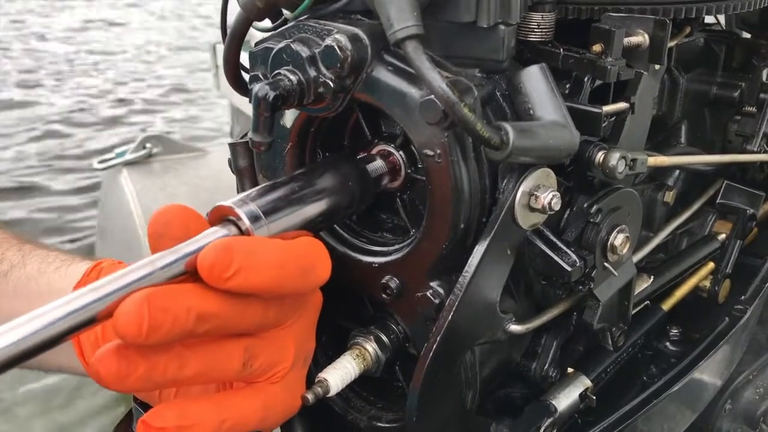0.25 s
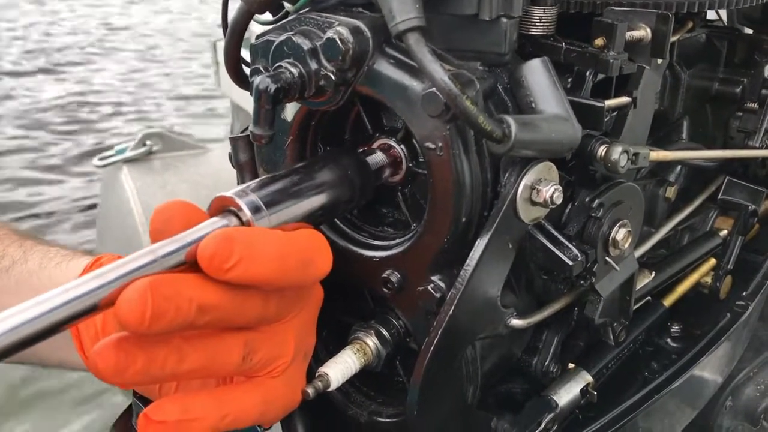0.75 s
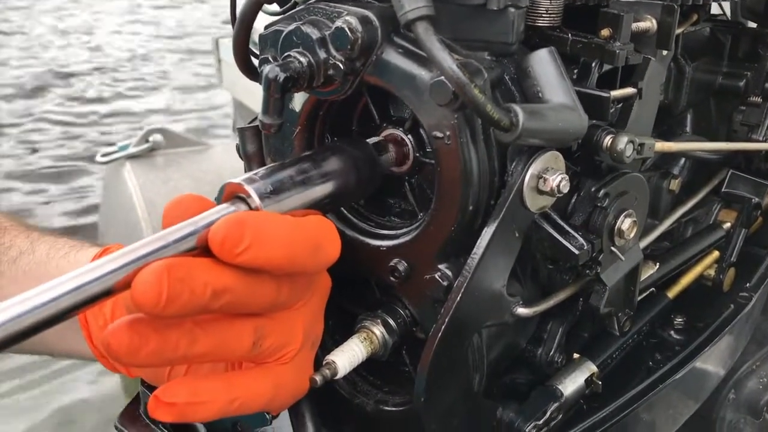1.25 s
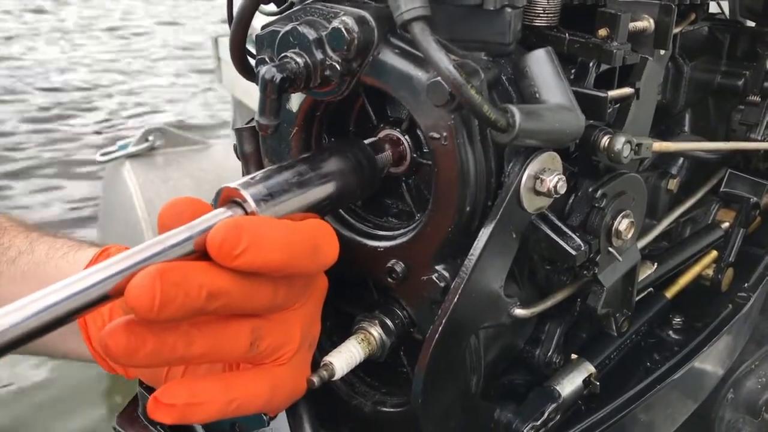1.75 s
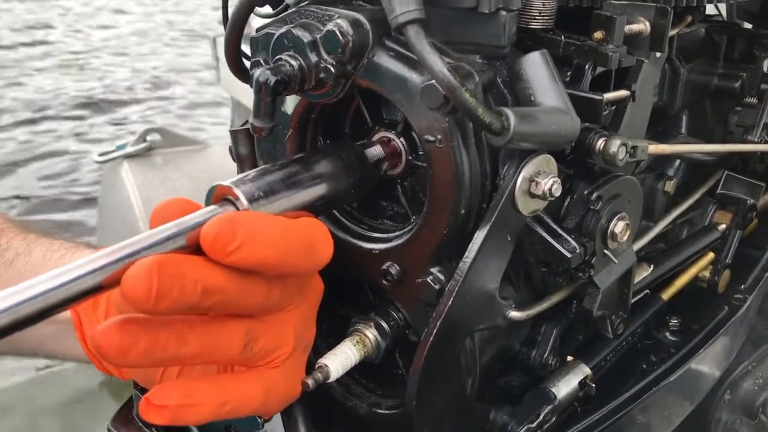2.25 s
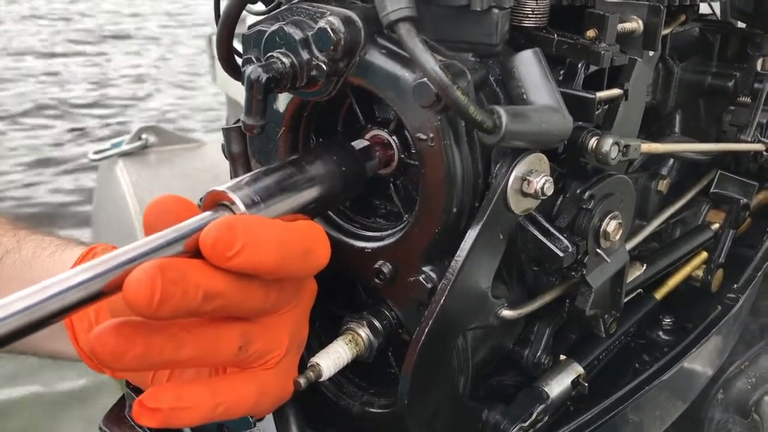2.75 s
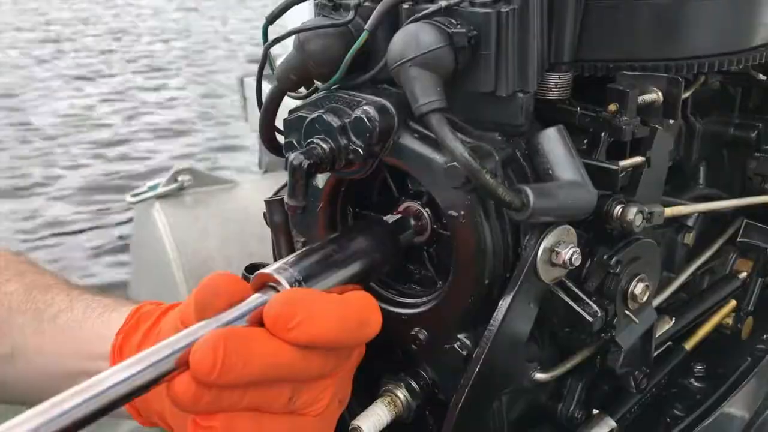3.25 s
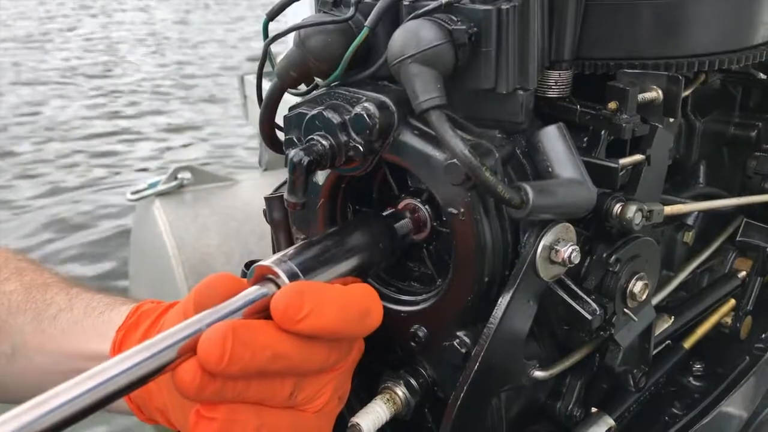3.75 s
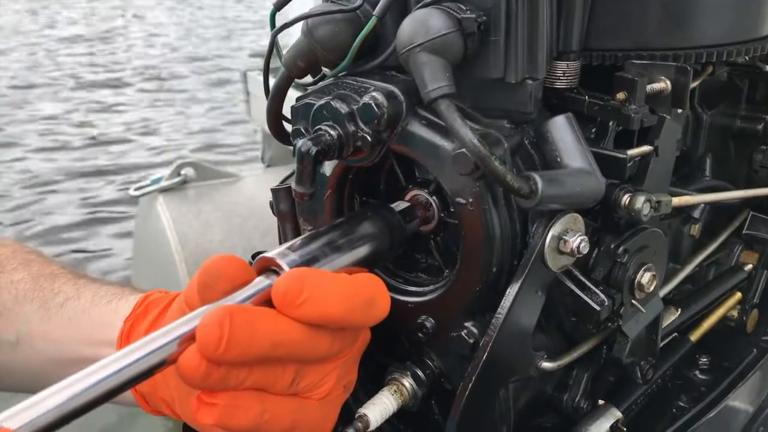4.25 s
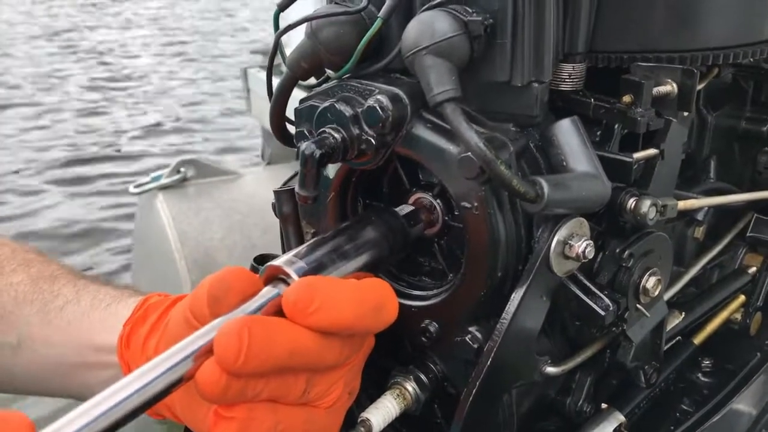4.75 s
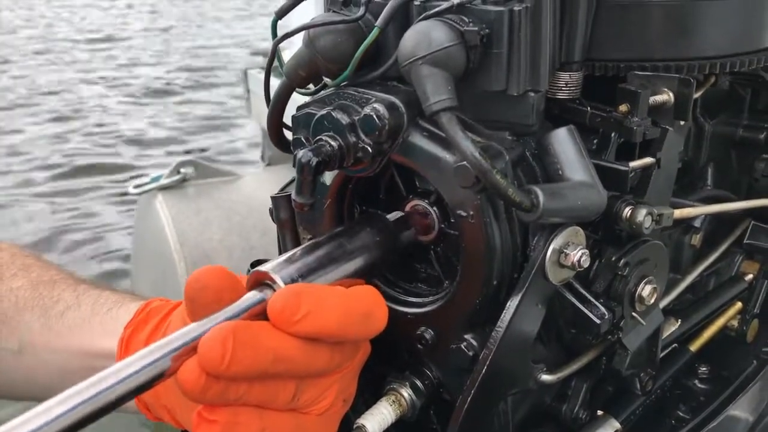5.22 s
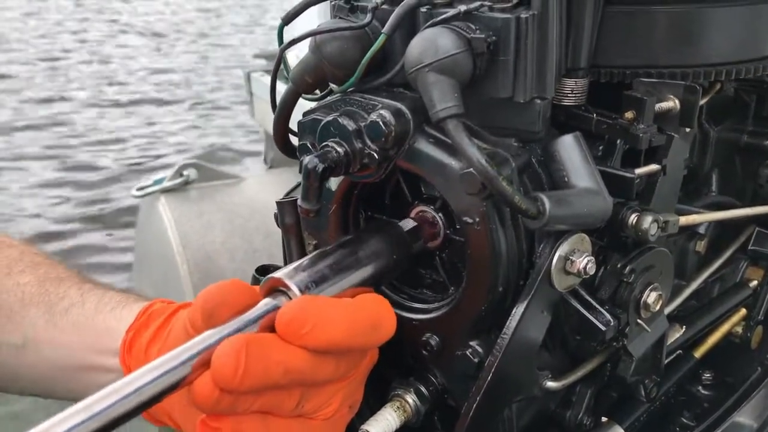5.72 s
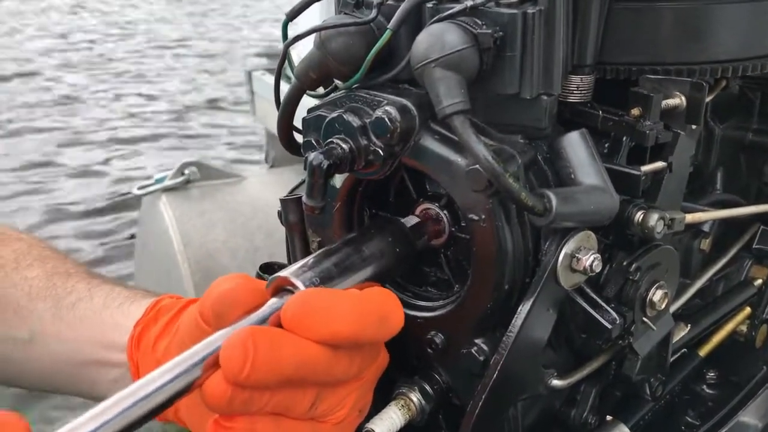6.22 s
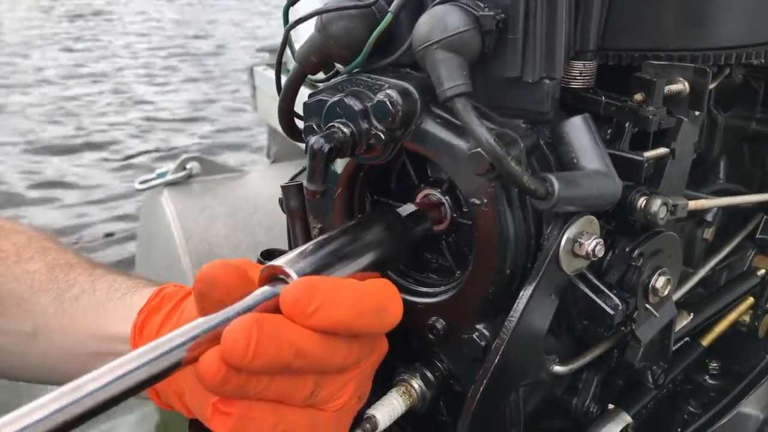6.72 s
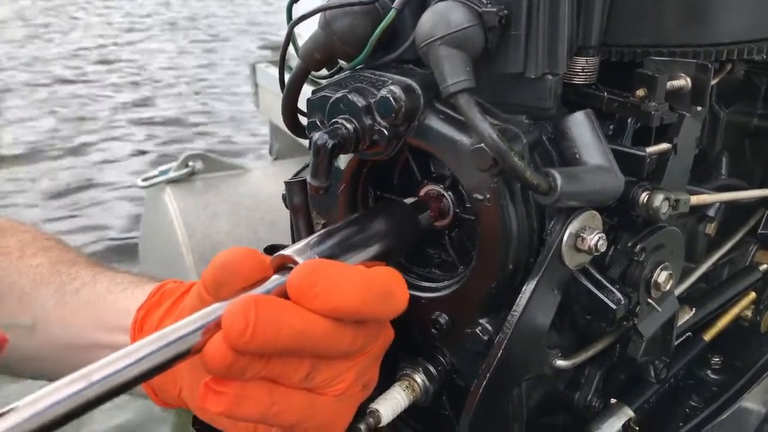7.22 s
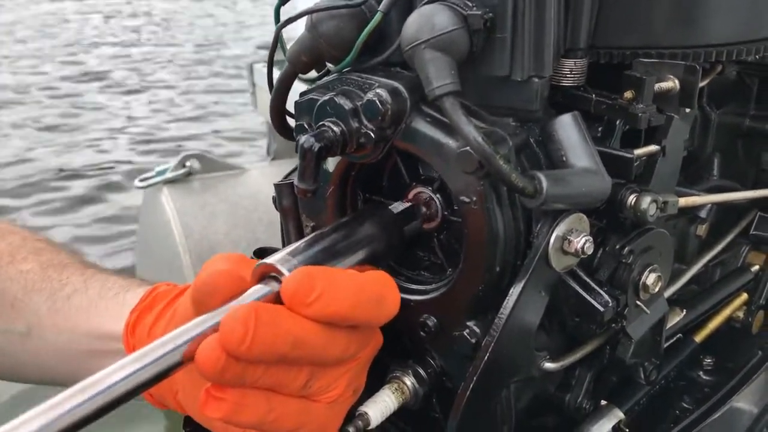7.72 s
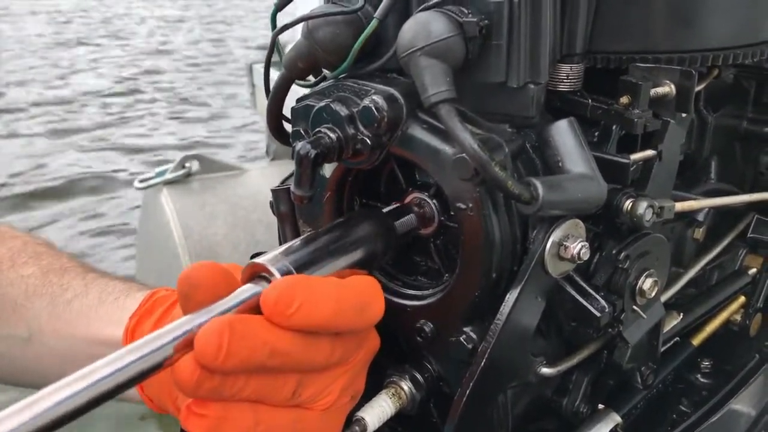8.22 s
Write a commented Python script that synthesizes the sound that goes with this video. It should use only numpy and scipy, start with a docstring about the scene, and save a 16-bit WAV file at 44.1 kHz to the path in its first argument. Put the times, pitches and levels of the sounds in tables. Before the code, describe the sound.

A socket ratchet clicks in six short bursts on an outboard engine, over low traffic rumble, lapping lake water and faint birds.

```python
"""By a lake, over traffic rumble and lapping, water plops and a socket ratchet on an outboard engine
is swung back in the first of six bursts of pawl clicks; between swings tool and gloves tick and rustle.
Far birds chirp throughout; from 2.6 s a near one whistles a figure three times. From about 3 s to 7 s
a far motor hums, then comes the last burst. After each loud click the close microphone stays in its
noisier high-level range for a moment."""
import sys
import numpy as np
from scipy import signal
from scipy.io import wavfile
from scipy.ndimage import uniform_filter1d

SR = 44100
rng = np.random.default_rng(int(sys.argv[2]) if len(sys.argv) > 2 else 0)


def inscribe(sig):
    """Save sig as 16-bit PCM at rate SR to the path in sys.argv[1].

    A 1-D sig is mono; a 2-D sig holds one channel per row.
    Samples are clipped to [-1, 1] before scaling.
    """
    pcm = np.round(np.clip(np.atleast_2d(sig).T, -1, 1) * 32767)
    wavfile.write(sys.argv[1], SR, pcm.astype(np.int16))


N = 373968


def undb(db):
    return 10 ** (np.asarray(db) / 20)


def band(x, lo_hz, hi_hz, order=2):
    sos = signal.butter(order, [lo_hz, min(hi_hz, .45 * SR)], "band", fs=SR, output="sos")
    return signal.sosfilt(sos, x)


def lowpass(x, hz):
    return signal.sosfilt(signal.ellip(10, .2, 70, hz, fs=SR, output="sos"), x)


def fade(t, t60_s):
    return np.exp(-np.log(1000) * t / t60_s)


def sine(pitch_hz):
    return np.sin(2 * np.pi * np.cumsum(pitch_hz) / SR)


def loudness(x):
    """Rms over 2 ms."""
    return np.sqrt(np.abs(uniform_filter1d(x ** 2, SR // 500)))


def add(out, start_s, x, db):
    """Mix x in with its loudest 2 ms at db."""
    i = int(start_s * SR)
    out[i:i + len(x)] += (x * undb(db) / loudness(x).max())[:N - i]


def drift(rate_hz):
    """Random steps, smoothed twice; spread near 1."""
    hold = int(SR / rate_hz)
    steps = np.repeat(rng.standard_normal(N // hold + 1), hold)
    return 1.665 * uniform_filter1d(uniform_filter1d(steps, hold), hold)[:N]


def curve(table, column):
    rows = np.array(table)
    return np.interp(np.arange(N) / SR, rows[:, 0], rows[:, column])


# Modes of head and handle. Each row: frequency in Hz, relative level in dB, T60 in seconds.
HEAD_MODES = [(2450, -3, .02), (3025, 7.5, 0.03), (3370, -2.5, 0.04), (4630, 1.5, 0.039),
              (5840, 20.5, 0.0067), (6770, 3, 0.017), (8670, 13, 0.012), (9800, -8, 0.016),
              (11300, -20, 0.007), (12100, 8, 0.016), (13100, 13, 0.017), (14330, 4, 0.017),
              (15800, 6, 0.017)]
# Each row: low and high edge of a click band in Hz.
CLICK_BANDS_HZ = [2300, 4000], [4000, 7500], [7500, 10500], [10500, 15400]
# Each row: start in seconds, level in dB, treble tilt in dB per octave.
PAWL_DROPS = [(0.2865, -13.8, 1.4), (0.327, -15.6, 1.2), (0.3678, -17.6, 2.4), (0.4052, -14.0, 2.0),
              (0.446, -13.3, 2.5), (0.4938, -14.7, 1.1), (0.5732, -15.5, 0.5), (1.637, -10.9, 3.8),
              (1.6865, -12.8, 2.2), (1.7251, -14.0, 0.2), (1.7727, -15.7, 4.0), (1.8244, -13.3, 2.4),
              (1.8759, -13.6, 5.1), (1.9203, -14.7, 0.7), (1.956, -16.3, 0.1), (3.2586, -18.4, -1.0),
              (3.2882, -16.7, 1.3), (3.3176, -16.1, 0.8), (3.3454, -16.1, 0.2), (3.3733, -18.0, -1.2),
              (3.3995, -17.7, -2.5), (3.4291, -17.7, 0.5), (3.472, -19.3, -0.0), (4.2825, -14.3, 1.2),
              (4.3099, -15.6, -1.4), (4.3331, -15.5, 0.1), (4.3566, -18.6, -1.7), (4.382, -16.6, -0.8),
              (4.4084, -20.4, -2.7), (4.4404, -18.8, -2.9), (4.47, -17.8, 1.7), (4.5013, -15.3, 1.3),
              (4.5413, -12.3, 2.4), (4.5909, -9.8, 2.8), (5.9061, -15.5, -1.1), (5.9739, -19.1, -3.1),
              (6.0111, -14.4, -2.8), (6.0434, -14.3, -4.2), (6.0771, -15.8, -5.2), (6.1071, -16.9, -0.2),
              (6.1373, -16.2, -1.8), (6.1694, -15.5, 1.1), (6.2231, -12.1, 3.3), (7.1162, -17.4, -1.4),
              (7.1611, -17.0, 0.1), (7.2033, -16.5, -1.1), (7.2383, -16.7, -3.1), (7.2656, -16.2, -1.4),
              (7.2937, -19.6, -4.8), (7.3237, -19.7, -4.6), (7.3584, -19.3, -2.6), (7.4012, -16.1, 1.9),
              (7.4582, -14.8, 3.2)]


def ratchet():
    """The pawl drops over a tooth: snap and rebound ring the head; engine parts scatter a tail."""
    out, t = np.zeros(N), np.arange(SR // 12) / SR
    hz, mode_db, t60_s = np.array(HEAD_MODES).T[:, :, None]
    octaves = np.log2(CLICK_BANDS_HZ).mean(axis=1)
    base_colour_db, knock_db = [-14, -6.5, -4, -3.5], -25.5
    for start_s, db, tilt_db in PAWL_DROPS:
        strength, detune, offset = rng.standard_normal((3, len(HEAD_MODES), 1))
        phase = 2 * np.pi * (hz * (1 + .006 * detune) * t + offset)
        modes = undb(mode_db + 2.5 * strength) * fade(t, t60_s) * np.sin(phase)
        ring = undb(-.9 * tilt_db)  # bright drops seat firmly and ring less
        head = .016 * ring * modes.sum(axis=0)
        head[0] += 1  # bare crack of steel on steel
        impact, tail = rng.standard_normal((2, len(t)))
        blow = impact * fade(t, .002)
        rebound_lag = int(SR * .0012 * rng.uniform(.8, 1.2))
        blow[rebound_lag:] += .68 * blow[:-rebound_lag]
        blow += tail * ring * (.14 * fade(t, .032) + .031 * fade(t, .097))
        snap = signal.fftconvolve(blow, head)[:len(t)]
        colour_db = base_colour_db + tilt_db * (octaves - octaves.mean())
        colour_db += .58 * rng.standard_normal(len(octaves))
        click = np.zeros(len(t))
        for (lo_hz, hi_hz), band_db in zip(CLICK_BANDS_HZ, colour_db):
            add(click, 0, band(snap, lo_hz, hi_hz, order=3), band_db)
        add(click, 0, band(snap, 1040, 2080), knock_db)  # through socket and engine block
        add(out, start_s, click, db)
    return out


# Each row: start in seconds, level in dB, band centre in Hz.
TOOL_TICKS = [(0.11, -40.5, 3140), (0.158, -52, 5900), (0.1935, -44.5, 2940), (0.2259, -48, 2440),
              (2.05, -47, 1440), (2.5, -46.5, 2730), (3.0065, -49, 4520), (3.028, -45.5, 4140),
              (3.638, -50.5, 2350), (3.8553, -49.5, 4200), (4.211, -51.5, 2400), (4.7614, -33, 6500),
              (4.793, -47.5, 3500), (4.828, -46.5, 1500), (5.163, -58, 2400), (5.5328, -50, 2120),
              (5.6685, -51.5, 3200), (5.686, -51.5, 2850), (5.7478, -43.5, 1860), (6.324, -48.5, 4540),
              (6.34, -45, 2800), (7.0, -43.5, 2230), (7.649, -41, 2140), (7.6804, -43, 1890),
              (7.7104, -44, 2420), (8.2123, -50.5, 1880), (8.238, -51, 1600), (8.35, -52.5, 2400),
              (8.372, -50.5, 8800)]


def tool_ticks(width_octaves=1.73, t60_s=.054):
    """Play in socket, extension and gloves: each knock is a short noise burst."""
    out, t = np.zeros(N), np.arange(SR // 10) / SR
    edge_ratio = 2 ** (width_octaves / 2)
    for start_s, db, hz in TOOL_TICKS:
        burst = rng.standard_normal(len(t)) * fade(t, t60_s) * (1 - fade(t, .0023))
        add(out, start_s, band(burst, hz / edge_ratio, hz * edge_ratio), db)
    return out


def rustle():
    """Gloves and ripples: faint crackles of uneven size, in patches."""
    rate_hz = 60 * undb(5 * drift(4))
    onsets = rng.random(N) < rate_hz / SR
    pops = onsets * undb(2.2 * rng.exponential(size=N))
    t = np.arange(SR // 30) / SR
    envelope = signal.oaconvolve(pops, fade(t, .048) * (1 - fade(t, .01)))[:N]
    return undb(-75.5) * band(envelope * rng.standard_normal(N), 740, 6300)


# Each row: start in seconds, level in dB, start pitch in Hz, ratio of end to start pitch.
HULL_PLOPS = [(.085, -49, 615, 1.66), (0.091, -44.5, 2150, 1.26), (.135, -43, 2760, 1.06),
              (1.945, -34.5, 1074, 0.93), (2.755, -33, 558, 1.32), (3.025, -48.5, 885, 1.14),
              (3.70, -47, 489, 1.6), (5.575, -39, 500, 0.71), (5.665, -47.5, 618, 1.4),
              (5.71, -47.5, 664, 1), (6.575, -43, 402, 0.92)]


def plops(glide_s=.04):
    """A bubble trapped at the hull rings, mostly gliding up as it surfaces; splash roughens it."""
    out, t = np.zeros(N), np.arange(SR // 6) / SR
    for start_s, db, hz, ratio in HULL_PLOPS:
        bubble = sine(hz * ratio ** np.minimum(t / glide_s, 1))
        splash = 1.94 * band(rng.standard_normal(len(t)), hz / 1.52, hz * 1.33)
        envelope = fade(t, .15 * np.sqrt(600 / hz)) * (1 - fade(t, .0062))
        add(out, start_s, (bubble + splash) * envelope, db)
    return out


# Each row: start in seconds, length in seconds, start and end pitch in Hz, level in dB.
BIRD_NOTES = [(2.329, 0.034, 4800, 3900, -55.5), (2.466, 0.029, 3290, 4160, -56),
              (2.934, 0.017, 3310, 3980, -49), (2.995, .012, 4820, 4280, -47),
              (3.029, .03, 4600, 2860, -49), (3.085, 0.044, 3600, 3210, -52.5),
              (3.13, 0.028, 3900, 2750, -49.5), (3.823, 0.079, 3500, 3540, -64),
              (4.125, 0.032, 5770, 5600, -57.5), (5.045, .095, 3450, 3290, -66),
              (6.572, 0.074, 6200, 6300, -57), (6.585, 0.071, 5520, 5480, -58),
              (7.538, 0.032, 3700, 5200, -64), (7.616, .03, 4500, 5500, -69),
              (8.353, .024, 5860, 5600, -68), (8.42, 0.026, 3570, 4600, -65)]
# A near bird's figure. Each row: as above, timed from the start of the figure.
BIRD_FIGURE = [(0, 0.029, 6740, 6240, -55.5), (0.047, .024, 5120, 3420, -45)]
# Start of each repeat in seconds.
FIGURE_STARTS_S = [2.611, 2.724, 2.838]


def birds(near_rasp=.132, echo_t60_s=.5, echo_db=2):
    """Gliding whistles, rasping with pitch flutter, blurred by echoes from the shore."""
    out = np.zeros(N)
    song = [(start_s + s, *note) for start_s in FIGURE_STARTS_S for s, *note in BIRD_FIGURE]
    near_notes = [(*note, near_rasp) for note in song + BIRD_NOTES]
    for start_s, length_s, from_hz, to_hz, db, rasp in near_notes + far_bird_notes():
        n = int(length_s * SR)
        flutter = uniform_filter1d(rng.standard_normal(SR // 4), size=30)[:n]
        pitch_hz = np.linspace(from_hz, to_hz, n) * (1 + rasp * flutter)
        add(out, start_s, sine(pitch_hz) * np.sqrt(np.hanning(n)), db)
    t = np.arange(SR // 2) / SR
    shore = rng.standard_normal(len(t)) * fade(t, echo_t60_s)
    shore /= np.linalg.norm(shore)
    return out + undb(echo_db) * signal.oaconvolve(out, shore)[:N]


def far_bird_notes(count=70):
    """Faint random chirps: rows like BIRD_NOTES, plus rasp depth."""
    when, length, pitch, glide, level, rasp = rng.random((count, 6)).T
    start_s, length_s = when * (N / SR - .2), .012 + .03 * length
    from_hz = 2600 * 2 ** (1.2 * pitch)
    to_hz = from_hz * (1 + .35 * (glide - .6))
    return list(zip(start_s, length_s, from_hz, to_hz, -69 + 7 * level, .3 + .6 * rasp))


# Each row: time in seconds, relative levels of traffic rumble and of lapping in dB.
LAKESIDE_SWELL = [(0, -47.5, -51.5), (.9, -47, -52.5), (2, -50.5, -50), (2.7, -49, -51.5),
                  (3.6, -47.5, -50), (4.8, -44, -50), (5.7, -47, -48), (6.5, -48, -51.5), (7.5, -45, -53),
                  (8.48, -49, -47)]
# Each row: frequency in Hz, relative noise density in dB.
LAKESIDE_SPECTRUM = [(25, -38.5), (40, -10.5), (70, 1.5), (102, -5), (170, -10), (335, -19), (700, -25),
                     (1300, -29.5), (1800, -36), (3000, -34.5), (5000, -40), (7000, -43.5), (8000, -44.5),
                     (16000, -47.5)]
HISS_TOP_HZ = 15800


def lakeside(rms_db=-43):
    """Flickering half-octave noise bands: traffic sways the bass, lapping water the low middle."""
    out = np.zeros(N)
    spectrum_hz, density_db = np.array(LAKESIDE_SPECTRUM).T
    traffic_db, lapping_db = curve(LAKESIDE_SWELL, column=1), curve(LAKESIDE_SWELL, column=2)
    traffic_db -= traffic_db.mean()
    lapping_db -= lapping_db.mean()
    noises = rng.standard_normal((2, N))  # neighbouring bands get unrelated noise
    for k, hz in enumerate(25 * 2 ** np.arange(0, 9.5, .5)):
        bass = 1 / (1 + (hz / 130) ** 4)
        middle = np.exp(-np.log2(hz / 340) ** 2)
        db = np.interp(np.log(hz), np.log(spectrum_hz), density_db) + 10 * np.log10(hz)
        swell_db = bass * traffic_db + middle * lapping_db
        flicker_db = (1 + 1.56 * middle) * drift(9)
        noise = band(noises[k % 2], hz / 2 ** .25, hz * 2 ** .25)
        out += undb(db + swell_db + flicker_db) * noise / noise.std()
    out = lowpass(out, HISS_TOP_HZ)
    return out * undb(rms_db) / out.std()


# Each row: frequency in Hz, level before the swell in dB.
MOTOR_TONES = [(167, -55), (248, -59)]
# Each row: time in seconds, gain in dB.
MOTOR_SWELL = [(2.9, -19), (3.3, 6.5), (4.8, 1.5), (5.3, 0), (6.6, 0), (6.9, -13)]


def far_motor():
    """Two hum tones waver together in pitch, swell and fade."""
    speed = 1 + .01436 * drift(12)
    hum = sum(undb(db + 1.8 * drift(22)) * sine(hz * speed) for hz, db in MOTOR_TONES)
    return hum * undb(curve(MOTOR_SWELL, column=1))


def scene():
    return (ratchet() + tool_ticks() + rustle() + plops() + birds() + lakeside() + far_motor())[None]


def high_range(level, enter_db=-14, stay_db=-26, hold_s=.4):
    """Microphone range: 1 from a peak over enter_db until nothing has passed stay_db for hold_s."""
    on, until, hold = np.zeros(len(level)), -1, int(hold_s * SR)
    for i in np.flatnonzero(level > undb(stay_db))[::8]:
        if level[i] > undb(enter_db) or i < until:
            on[max(i, until):i + hold] = 1
            until = i + hold
    return on


def record(dry):
    """The high-level range adds converter hiss; the port dips a narrow treble band; the top is cut."""
    port_hz, dip_depth, top_hz = 10450, .57, 16600
    hiss = lowpass(band(rng.standard_normal(N), 1500, HISS_TOP_HZ, order=1), HISS_TOP_HZ)
    out = dry + undb(-55) * high_range(loudness(dry[0])) * hiss
    out -= dip_depth * band(out, port_hz - 400, port_hz + 400, order=1)
    return lowpass(np.clip(out, -1, 1), top_hz)


dry = scene()
out = record(dry)
inscribe(out)
```